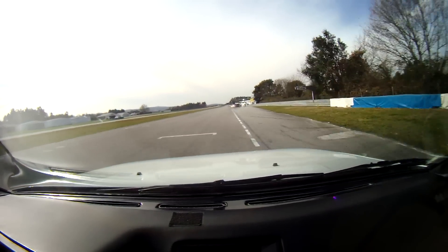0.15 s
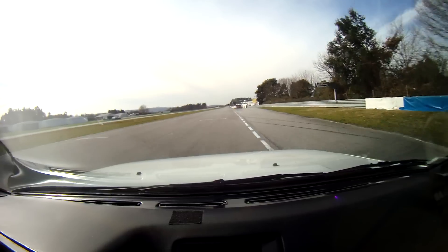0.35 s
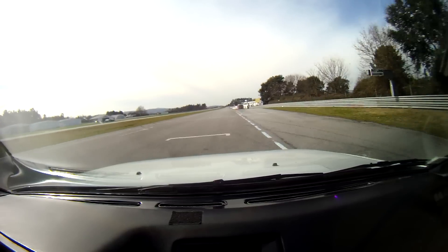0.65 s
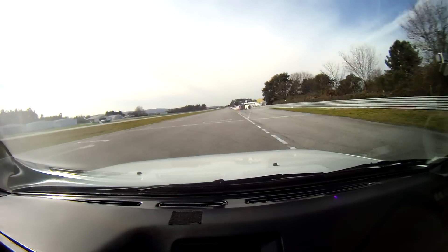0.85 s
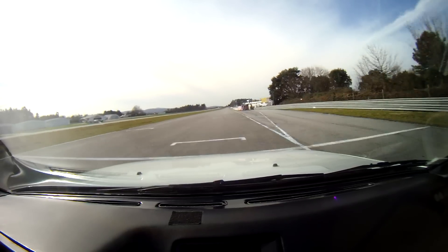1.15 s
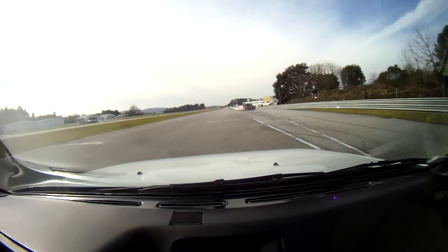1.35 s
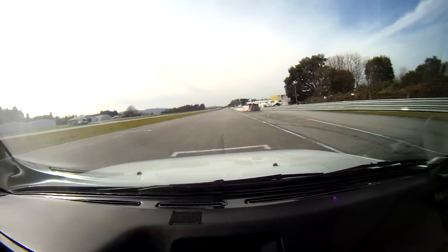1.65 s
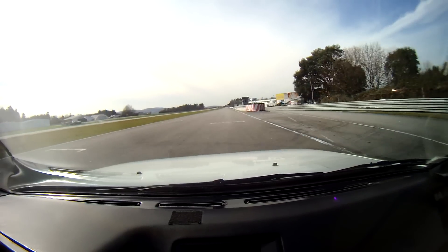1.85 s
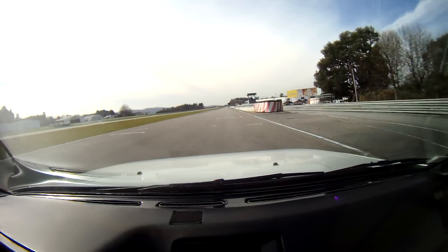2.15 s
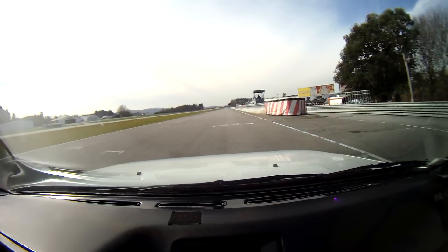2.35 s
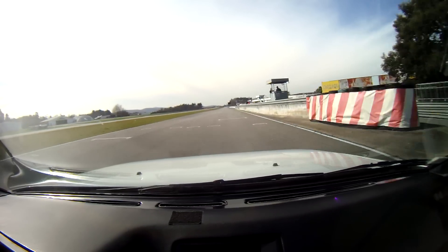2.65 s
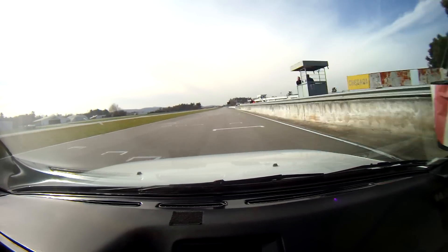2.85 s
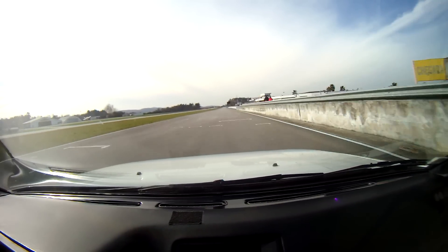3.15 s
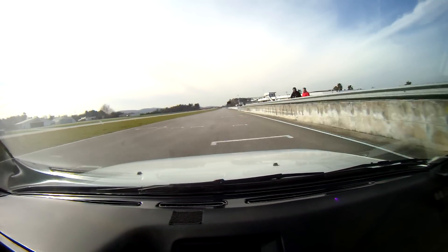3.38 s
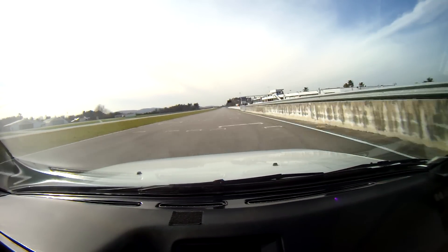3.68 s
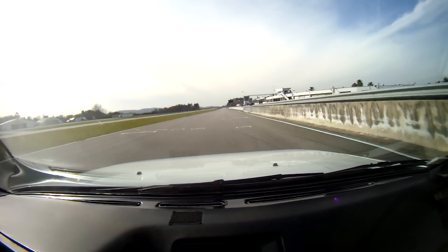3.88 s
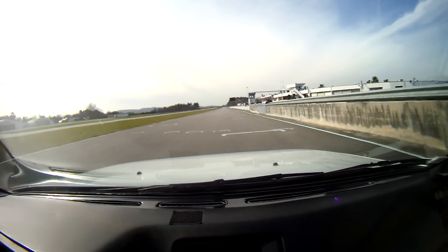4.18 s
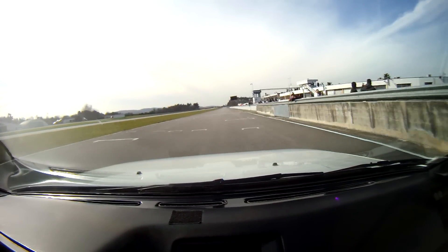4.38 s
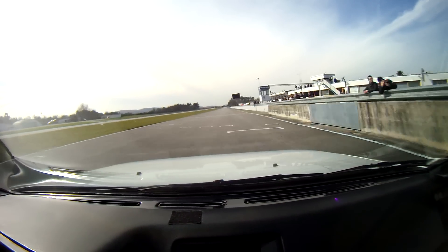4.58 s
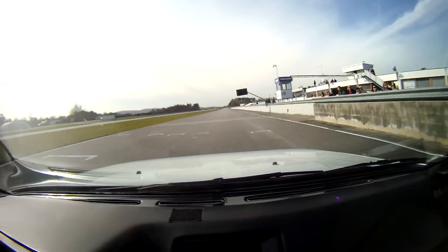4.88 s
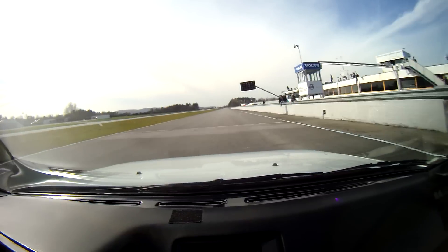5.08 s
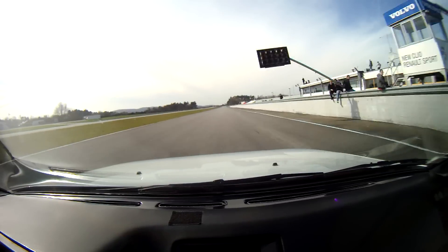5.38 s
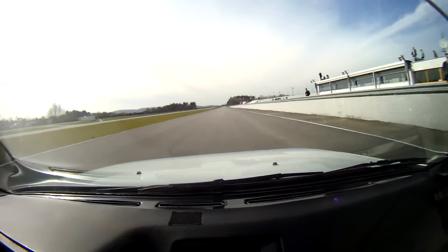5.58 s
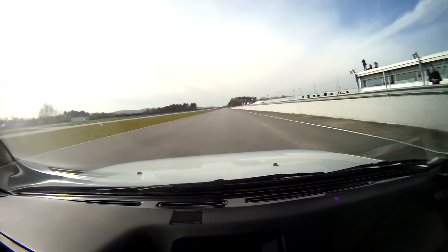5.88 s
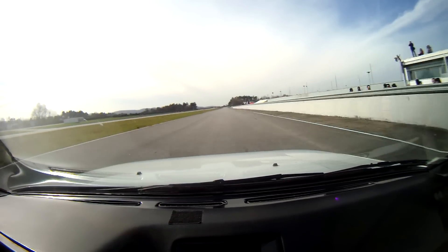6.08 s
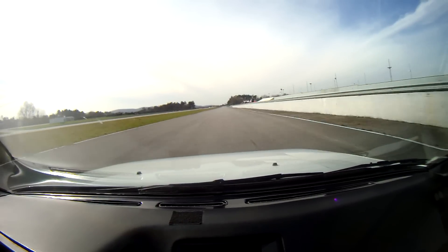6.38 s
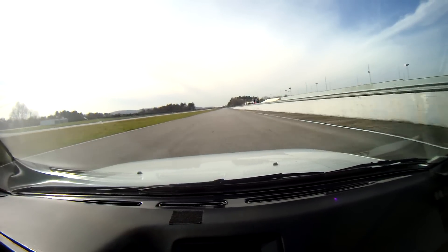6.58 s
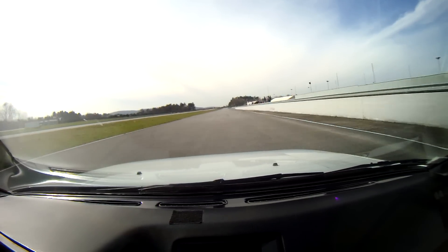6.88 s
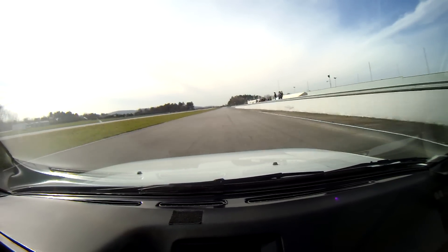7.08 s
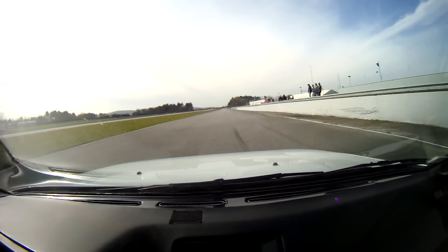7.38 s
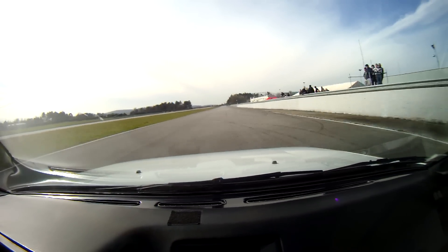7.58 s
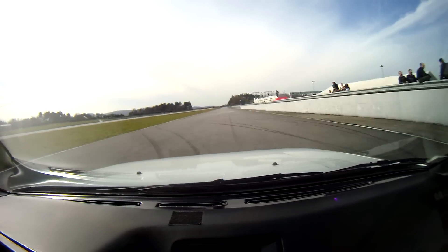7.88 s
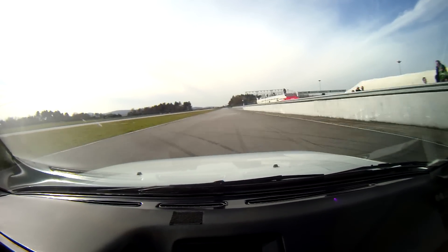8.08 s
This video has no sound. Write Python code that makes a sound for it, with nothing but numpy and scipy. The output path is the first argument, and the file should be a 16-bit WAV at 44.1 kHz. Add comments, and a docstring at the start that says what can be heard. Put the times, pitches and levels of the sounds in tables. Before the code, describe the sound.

From 0 to 2.3 seconds, a four-cylinder engine at full throttle fills the car cabin, already high and climbing steadily. Deep boom and rough exhaust growl mix with churning valve noise and an intense rasping buzz from a loose panel, strongest in the first second or so. Around 2.3 a hard knock marks the throttle closing; the roar collapses and revs coast down, with slight judder and knocks near 2.65 and 2.9. From about 2.9 the higher gear bites with a brief wobble, and the engine pulls again from a lower pitch, rising more slowly to the end near 8 seconds as growl and buzz grow again. Bumps thump near 3.5, 3.7, 4.8, 7.05, 7.35, 7.6 and 8, with scattered panel slaps. Tyre rumble, slow wheel shudder and faint wind lie beneath; the close cabin microphone clips and crackles on the loudest peaks.

```python
"""Sports car racing through a gear change

Inside the cabin, a four-cylinder engine revs out, shifts up and pulls hard again on a race track.
Tones tied to the crank boom and growl, filtered noise makes the valve churn, and each firing makes
a loose panel buzz. Slow shudder from the wheels, bumps and shaped noise for road and wind lie
beneath. The sum is cut off at a hard ceiling, as in an overloaded microphone."""
import sys
import numpy as np
from scipy import signal
from scipy.fft import rfft, irfft, next_fast_len
from scipy.io import wavfile
from scipy.ndimage import uniform_filter1d, map_coordinates

SR = 44100
rng = np.random.default_rng(int(sys.argv[2]) if len(sys.argv) > 2 else 0)


def output_pcm(signal):
    """Save a mono or channel-first signal as 16-bit PCM at the path in sys.argv[1].

    Samples are clipped to [-1, 1] before scaling.
    """
    pcm = np.clip(np.atleast_2d(signal).T, -1, 1) * 32767
    wavfile.write(sys.argv[1], SR, np.round(pcm).astype(np.int16))


N = 363384

# how far the throttle is open: (time_s, throttle from 0 to 1)
THROTTLE_OPENING = [(2.3, 0.99), (2.36, 0), (2.75, 0.4), (2.93, 0.82)]
LIFT_S = 2.345  # the revs start to coast down for the shift


def crank():
    """Crank turns per second: a steady climb, a coast, then a slower climb against drag."""
    low_gear_speed, low_gear_gain = 121.05, 7.23  # turns per second, and their gain per second
    high_gear_speed, high_gear_gain, drag_per_s = 97.6, 4.43, .068
    catch_s, clutch_s, coast_per_s = 2.79, 2.9, .6  # the throttle catches the revs, the clutch bites
    driveline_hz, driveline_decay_s = 5.645, .065
    t = np.arange(N) / SR
    low_gear = low_gear_speed + low_gear_gain * np.minimum(t, LIFT_S)
    free = low_gear * np.exp(-coast_per_s * (np.clip(t, LIFT_S, catch_s) - LIFT_S))
    since = np.maximum(t - clutch_s, 0)
    pull = high_gear_speed + high_gear_gain * (1 - np.exp(-drag_per_s * since)) / drag_per_s
    # the speed wobbles as the clutch bites
    slip = np.exp(-since / driveline_decay_s) * np.cos(2 * np.pi * driveline_hz * since)
    return pull + slip * (free - pull)


def shaking(speed):
    """How hard engine and driveline shake the body, most of all at certain revs."""
    # revs that shake the body: (turns_per_s, half_width_turns_per_s, level_db)
    shake_peaks = [(102.3, 2.3, -33.5), (117.96, 2.9, -26), (125.75, 7.27, -5.5), (137.23, 2.57, -19.5)]
    # the driveline judders as the next gear goes in: (start_s, hold_s, level_db)
    judder_times = [(2.624, .07, -25.5), (2.751, 0.13, -24.5)]
    rise_s, decay_s = 0.033, 0.065
    judder = sum(amp(db) * burst(s, rise_s, hold_s, decay_s) for s, hold_s, db in judder_times)
    return loaded(resonant(speed, -41.5, shake_peaks), shut_db=-42) + judder


def buzz(turns, speed, shake):
    """Each firing throws the panel against its seat: stray ticks, then bunches, then an even rasp."""
    # share of the panel's shaking from each cylinder in turn: (relative_level_db)
    cylinder_shares = [0, -10.5, -8, 2.5]
    # fine grit of the panel's edge on its seat: (pitch_hz, relative_level_db_per_hz)
    grit_color = [(1200, -30.5), (2200, 5.5), (2900, 0.5), (3500, -7), (4100, -1.5), (5000, -23),
                  (6000, -15), (8000, -23.5), (15000, -30)]
    level_db = 20 * np.log10(shake)
    at = np.flatnonzero(np.diff(np.floor(2 * turns)))  # two firings per crank turn
    size, late = rng.standard_normal((len(at), 2)).T
    # the harder the shaking, the more equal the hits
    ragged = np.interp(level_db[at], [-30, -21, -15, -7], [1.7, 1.05, 1, .35])
    # hits follow the cylinders' pattern and come in bunches, less so at top revs
    high = np.clip((speed[at] - 117) / 13, 0, 1)
    pattern_share = np.interp(speed[at], [111, 116, 130], [.95, .55, .95])
    pattern_db = np.resize(cylinder_shares, len(at)) * pattern_share
    bunch_db = (6.5 - 4 * high) * np.tanh(1.4 * wobble(45)[at])
    size_db = ragged * (pattern_db + bunch_db + 1.4 * size)
    hit_at = np.clip(at + (0.0002 * SR * late).astype(int), 0, N - 1)
    hits = np.bincount(hit_at, amp(size_db), N)
    one_hit = twang(start_hz=2677, end_hz=1362, fall_s=0.0011, peak_s=0.0019)
    chirps = signal.fftconvolve(hits, one_hit)[:N]
    # every hit scrapes on for a moment and stirs the panel's other modes
    t = np.arange(SR // 100) / SR
    contact = signal.fftconvolve(hits, t / .0008 * np.exp(-t / 0.00099))[:N]
    scrape = panel_ring(contact * noise())
    ring = steady(unit(chirps) + .48 * unit(scrape), span_s=.13)
    # weak shaking holds the ring back; only hard shaking brings out the grit
    loose_db = np.interp(level_db, [-35, -28.5, -29.5, 8.5], [-9.0, -4.5, 0.0, -1])
    grit_db = np.interp(level_db, [-22, -15, -8], [-42, -27, -17])
    grit = steady(coloured(contact * noise(), grit_color), span_s=0.39)
    return amp(level_db) * (amp(loose_db) * ring + amp(grit_db) * grit)


def twang(start_hz, end_hz, fall_s, peak_s):
    """One hit on the panel: treble bending waves arrive first, so the pitch falls within a few ms."""
    t = np.arange(SR // 80) / SR
    hz = end_hz + (start_hz - end_hz) * np.exp(-t / fall_s)
    swell = (t / peak_s * np.exp(1 - t / peak_s)) ** 3
    return swell * np.sin(2 * np.pi * np.cumsum(hz) / SR)


def panel_ring(force, soft_hz=3000):
    """The panel's modes answer a force; the contact is too soft to excite the treble."""
    # ways the panel likes to ring: (pitch_hz, width_hz, relative_level_db)
    panel_modes = [(1546, 160, 3.5), (1960, 290, -8), (2255, 170, -1.5), (1222, 240, -1), (760, 780, -14.5),
                   (4270, 420, -9.5)]

    def response(f):
        modes = sum(amp(db) * 1j * f * width / (hz * hz - f * f + 1j * f * width)
                    for hz, width, db in panel_modes)
        return modes / (1 + (f / soft_hz) ** 6)

    return filtered(force, response)


def slaps():
    """Jolts knock the panel once each, with a small rebound."""
    # single hard knocks, each landing 1 ms after its time: (time_s, relative_level_db)
    slap_times = [(2.2949, -2), (2.6566, -12.5), (2.8819, -7.5), (2.9592, -13.5), (3.0021, -18),
                  (3.026, -15), (3.7466, -10), (3.9445, -16), (4.2592, -15), (4.4716, -15), (4.778, -17),
                  (4.853, -11.5), (5.004, -12.5), (5.2102, -13.5), (6.8505, -11.5), (6.9207, -14.5),
                  (7.0975, -10), (7.2395, -12.5), (7.3569, -7.5), (7.5528, -10), (7.6205, -10.5)]
    force = np.zeros(N)
    for s, db in slap_times:
        force[round((s + .001) * SR)] += amp(db)
        force[round((s + rng.uniform(.003, .006)) * SR)] += amp(db - 11)  # rebound
    one_knock_peak = np.abs(panel_ring(signal.unit_impulse(N, SR))).max()
    return amp(2.5) * panel_ring(force) / one_knock_peak


def growl(turns, speed, shake):
    """Exhaust tones at multiples of the crank speed, plus rasping noise, follow revs and throttle."""
    # (waves_per_crank_turn, then relative levels: top_revs_db, middle_revs_db, throttle_shut_db)
    growl_orders = [(2.5, -13.5, 5.5, -21), (3, -17.5, -9, 2), (3.5, -19.5, -1.5, -28),
                    (4, -0.5, -12.5, -1), (4.5, -8, -4, -17), (5, -19.5, -5.5, -16.5),
                    (5.5, -6.5, -10, -25.5), (6, -4, -13.5, -11.5), (6.5, -17.5, -17.5, -24),
                    (7, -20.5, -12.5, -17), (7.5, -17, -21.5, -30.5), (8, -7.5, -19, -18)]
    throttle = curve(THROTTLE_OPENING)
    high = np.clip((speed - 109) / 13, 0, 1)
    # combustion is rougher at high revs; some roughness stays with the throttle shut
    rough = np.maximum(throttle, .45) * np.interp(speed, [112, 126, 136], [.55, .85, 1.5])
    tones = np.zeros(N)
    for order, top_db, mid_db, shut_db in growl_orders:
        open_db = high * top_db + (1 - high) * mid_db
        db = throttle * open_db + (1 - throttle) * shut_db
        # roughness shakes the higher orders most
        tones += amp(db) * order_tone(turns, order, waver_db=2.0, jitter=0.014 * order * rough)
    rasp_color = [(150, -22.0), (350, -0.5), (560, 16.5), (750, 2.5), (920, -10.5), (1100, -2.0),
                  (1500, -8.5), (3000, -41.5), (8000, -80)]
    rasp = coloured(noise(), rasp_color)
    # after the lift the exhaust hums on briefly
    overrun = amp(-45) * burst(LIFT_S + .07, rise_s=0.083, hold_s=0.068, decay_s=0.05)
    gain = loaded(amp(-45), shut_db=-57) + overrun + amp(-18.5) * shake ** .78
    return gain * (tones + amp(-1) * rough * rasp)


def boom(turns, speed):
    """The lowest crank tones fill the cabin, each swelling at its own revs."""
    # (waves_per_crank_turn, throttle_open_db, throttle_shut_db, waver_db, phase_jitter_cycles)
    low_orders = [(1, -44, -30.5, 2, 0.064), (1.5, -33, -49.5, 1.06, .011), (2, -29.5, -33.5, 0.93, 0.0055)]
    # where a tone meets a cabin resonance:
    # (waves_per_crank_turn, turns_per_s, half_width_turns_per_s, level_db)
    boom_peaks = [(1, 125.5, 6.4, -27.5), (1, 135, 4, -25), (1.5, 103.8, 8.2, -25.5),
                  (1.5, 115.5, 3.5, -28.5), (2, 99.9, 4.16, -21.5), (2, 114.5, 5.6, -40),
                  (2, 122.5, 2.2, -21), (2, 129.3, 4.2, -21)]
    tones = np.zeros(N)
    for order, open_db, shut_db, waver_db, jitter in low_orders:
        peaks = [row[1:] for row in boom_peaks if row[0] == order]
        gain = loaded(resonant(speed, open_db, peaks), shut_db)
        tones += gain * order_tone(turns, order, waver_db, jitter)
    return tones


def valves(turns, speed):
    """Mechanical churn: noise that swells most strongly once in each four-stroke cycle."""
    # (pitch_hz, relative_level_db_per_hz)
    churn_color = [(300, -25), (600, -5), (900, -14.5), (1200, -1), (1450, 0), (1900, -1.5), (2200, -7.5),
                   (2550, -10.5), (3000, -20), (3500, -34.5), (4100, -38), (5000, -58), (8000, -74.5),
                   (15000, -91)]
    # revs at which the valves churn loudest: (turns_per_s, half_width_turns_per_s, relative_level_db)
    churn_peaks = [(103.5, 2.96, -30.5), (122.3, 6.8, -18.5)]
    gain = loaded(resonant(speed, -33.5, churn_peaks), shut_db=-39.5)
    # a four-stroke cycle takes two crank turns; a weaker swell comes with each firing
    swell_db = 6.5 * np.cos(np.pi * turns) + np.cos(4 * np.pi * turns) + 2.2 * wobble(70)
    churn = unit(amp(swell_db) * coloured(noise(), churn_color))
    return gain * amp(-3.0) * churn


def whine(turns, speed):
    """A thin tone from the drive gears, ten waves per crank turn."""
    # revs at which the gears sing: (turns_per_s, half_width_turns_per_s, level_db)
    whine_peaks = [(99.6, 1, -47.5), (107.6, 2.8, -50.5), (109.4, 4.2, -56)]
    return resonant(speed, -61.5, whine_peaks) * order_tone(turns, order=10, waver_db=2, jitter=.04)


def bumps():
    """Bumps in the track throw the body down, up and down again, as one and a half slow waves."""
    # (start_s, bounce_hz, peak_level_db)
    bump_times = [(3.508, 24, -5.5), (3.72, 23, -3.5), (4.8, 15.2, 1), (7.05, 23, -8.5), (7.347, 21, -6.5),
                  (7.611, 23, -9), (7.97, 26, -8.5)]
    heave = np.zeros(N)
    for s, hz, db in bump_times:
        cycles = np.clip((np.arange(N) / SR - s) * hz, 0, 1.5)
        fade = np.abs(np.sin(np.pi * cycles / 1.5)) ** .3
        heave -= amp(db) * np.sin(2 * np.pi * cycles) * fade
    return heave


def jolting():
    """Extra shudder and thudding while the wheels cross rough asphalt."""
    # stretches of rough asphalt: (start_s, hold_s, shudder_level_db, thud_level_db)
    rough_patches = [(0.0, 0.15, -4, -21), (1.011, .16, -10, -29.5), (1.354, 0.12, -8.5, -22.5),
                     (1.673, 0.039, -15, -17.5), (2.272, 0.078, -10, -18.5), (2.517, 0.13, -19.5, -28.5),
                     (2.851, 0.054, -22.5, -19), (3.492, .1, -23, -23), (3.719, .06, -13.5, -33.5),
                     (4.716, .3, -20, -15.5), (6.639, 0.04, -12.5, -25.5), (7.887, .35, -18, -21.5)]
    shudder, thud = np.zeros((2, N))
    for s, hold_s, shudder_db, thud_db in rough_patches:
        crossing = burst(s, rise_s=.05, hold_s=hold_s, decay_s=.045)
        shudder += amp(shudder_db) * crossing
        thud += amp(thud_db) * crossing
    return shudder, thud


def road(rough_shudder, rough_thud):
    """Wheel turns shudder the body; tyres rumble, the suspension thuds and wind rushes past."""
    # how fast the wheels turn: (time_s, turns_per_s)
    wheel_turns = [(0, 17.8), (2.3, 22.35), (4.3, 23), (8.24, 29.56)]
    # wheels hop on their tyres at these speeds: (turns_per_s, half_width_turns_per_s, level_db)
    hop_peaks = [(21.61, 1.4, -21.5), (27.4, 0.5, -28)]
    # noise colors of body shudder, tyre rumble, suspension thud and wind:
    # each (pitch_hz, relative_level_db_per_hz)
    shudder_color = [(6, -36), (14, -14), (19, 1), (23, 0.5), (27, -2), (34, -14), (50, -26), (100, -93.5),
                     (300, -140)]
    rumble_color = [(20, -20), (34, -1.5), (48, 0.5), (65, -9.5), (90, -11.5), (130, -15), (200, -22),
                    (300, -26.5), (500, -37.5), (800, -42), (1500, -53.5), (4000, -95.5), (12000, -120)]
    thud_color = [(20, -16), (36, 0.5), (55, 3.5), (80, -12), (120, -23.5), (250, -34), (600, -71.5),
                  (2000, -120)]
    wind_color = [(300, 5), (1500, 8.5), (2600, 5), (3400, -8.5), (4100, 0.5), (5000, -11.5), (8000, -19.5),
                  (15000, -26.5)]
    wheel_rate = curve(wheel_turns)
    wheel = order_tone(np.cumsum(wheel_rate) / SR, order=1, waver_db=1.0, jitter=0.084)
    hop = resonant(wheel_rate, -16, hop_peaks)
    shake = steady(wheel + 1.31 * coloured(noise(), shudder_color), span_s=0.2)
    shudder = (hop + rough_shudder) * shake
    # the rumble gains 3.5 dB per doubling of wheel speed
    rolling = amp(-23.5 + 3.5 * np.log2(wheel_rate / wheel_rate[0]))
    rumble = rolling * steady(coloured(noise(), rumble_color), span_s=0.16)
    thud = rough_thud * steady(coloured(noise(), thud_color), span_s=0.14)
    wind = amp(-55 + 1.3 * wobble(4.2)) * coloured(noise(), wind_color)
    return shudder + rumble + thud + wind


def order_tone(turns, order, waver_db, jitter):
    """A tone with order waves per turn, whose size and phase (in cycles) waver at random."""
    phase = order * turns + rng.random() + jitter * wobble(30)
    return np.sqrt(2) * amp(waver_db * wobble(22)) * np.sin(2 * np.pi * phase)


def resonant(speed, base_db, peaks):
    """Gain that swells as the turning speed passes through each resonance."""
    swells = sum(amp(db) * np.exp(-((speed - centre) / width) ** 2) for centre, width, db in peaks)
    return amp(base_db) + swells


def loaded(open_gain, shut_db):
    """A gain that moves to shut_db as the throttle shuts."""
    throttle = np.clip(curve(THROTTLE_OPENING), 0, 1)
    return open_gain ** throttle * amp(shut_db * (1 - throttle))


def burst(start_s, rise_s, hold_s, decay_s):
    """A loudness curve that rises, holds and dies away."""
    t = np.arange(N) / SR - start_s
    return np.clip(t / rise_s, 0, 1) * np.exp(-np.maximum(t - rise_s - hold_s, 0) / decay_s)


def curve(rows):
    """Joins (time, value) points with straight lines, one value per sample."""
    s, value = np.transpose(rows)
    return np.interp(np.arange(N) / SR, s, value)


def wobble(rate):
    """A smooth random curve through rate random points a second."""
    coarse = np.arange(0, N + 64, 64)
    points = rng.standard_normal(int(N * rate / SR) + 4)
    smooth = map_coordinates(points, [coarse * rate / SR])
    return np.interp(np.arange(N), coarse, smooth)


def noise():
    """White noise: equally strong at all pitches."""
    return rng.standard_normal(N)


def filtered(x, response):
    """Multiplies each frequency in x by the response at that frequency."""
    size = next_fast_len(N + SR // 2)
    return irfft(rfft(x, size) * response(np.fft.rfftfreq(size, 1 / SR)), size)[:N]


def coloured(x, points):
    """Shapes x by (Hz, dB) points on a log pitch axis, then sets its average (rms) level to 1."""
    hz, db = np.transpose(points)
    return unit(filtered(x, lambda f: amp(np.interp(np.log(f + 1), np.log(hz), db))))


def steady(x, span_s):
    """Evens out x so that its level stays near rms 1 over each span."""
    power = np.abs(uniform_filter1d(x ** 2, int(span_s * SR) + 1))
    return x / np.sqrt(power + 1e-12)


def unit(x):
    """Scales x to an rms level of 1."""
    return x / np.sqrt(np.mean(x ** 2) + 1e-20)


def amp(db):
    """Turns decibels into a gain factor."""
    return 10 ** (np.asarray(db) / 20)


def scene():
    """The engine sounds follow the crank; engine and road together shake the panel."""
    speed = crank()
    turns = np.cumsum(speed) / SR
    shake = shaking(speed)
    rough_shudder, rough_thud = jolting()
    # a small share of the road's jolting reaches the panel
    panel = buzz(turns, speed, shake + amp(-23) * rough_shudder) + slaps()
    engine = growl(turns, speed, shake) + boom(turns, speed) + valves(turns, speed) + whine(turns, speed)
    body = bumps() + road(rough_shudder, rough_thud)
    return (engine + panel + body)[None]


def record(dry):
    """The microphone overloads at a hard ceiling, which crackles; faint hiss and a treble cutoff follow."""
    top_hz = 15750
    clipped = np.clip(dry[0], -.7, .7)
    hiss = amp(-91.5) * noise()
    return filtered(clipped + hiss, lambda f: f < top_hz)[None]


dry = scene()
out = record(dry)
output_pcm(out)
```